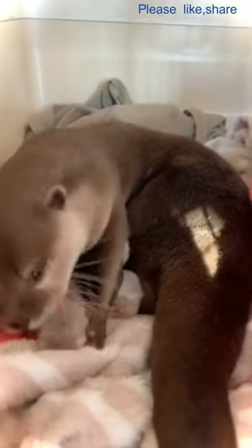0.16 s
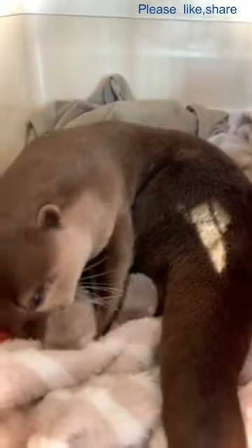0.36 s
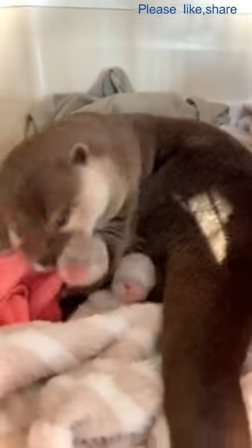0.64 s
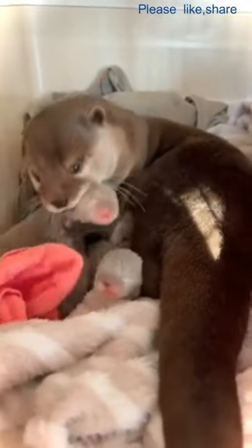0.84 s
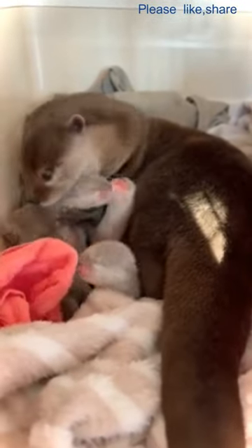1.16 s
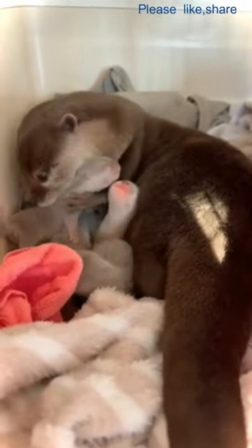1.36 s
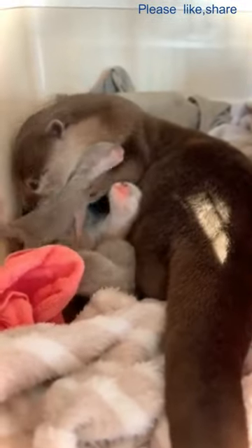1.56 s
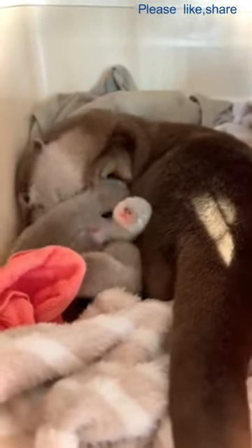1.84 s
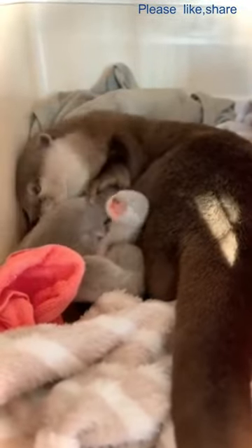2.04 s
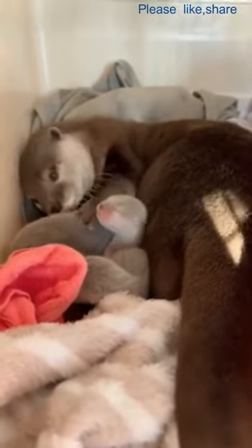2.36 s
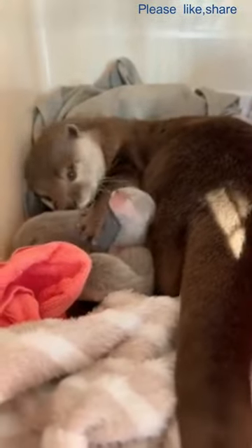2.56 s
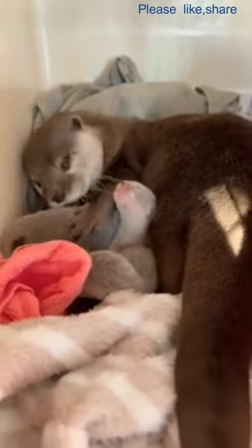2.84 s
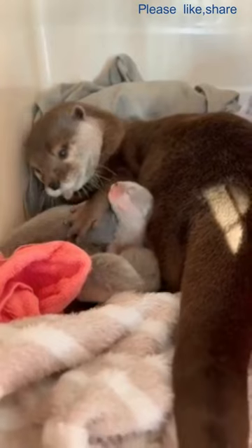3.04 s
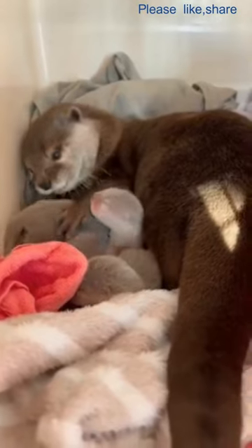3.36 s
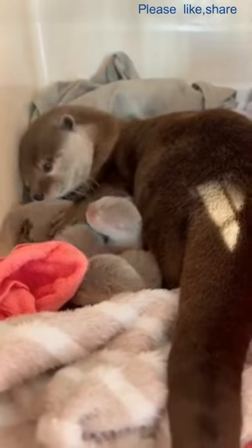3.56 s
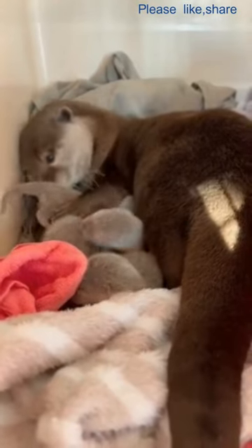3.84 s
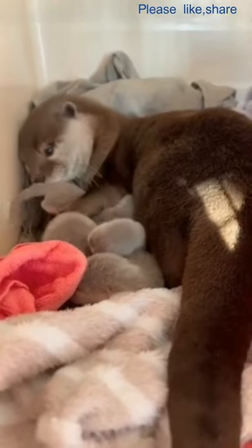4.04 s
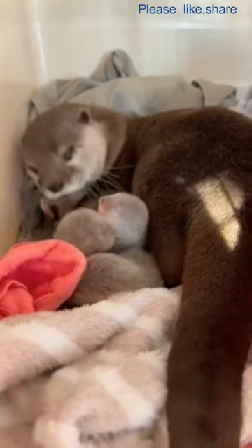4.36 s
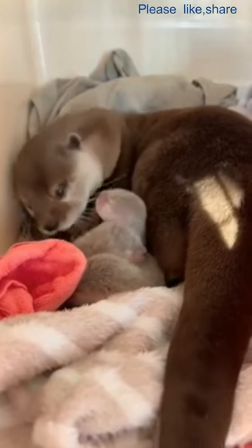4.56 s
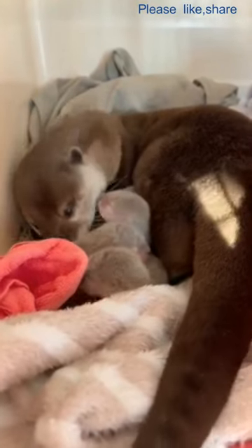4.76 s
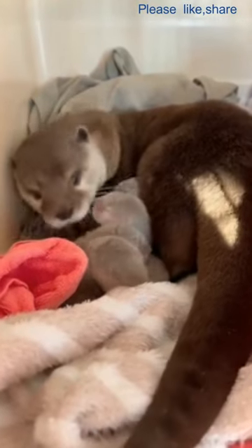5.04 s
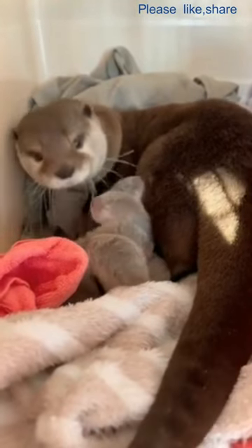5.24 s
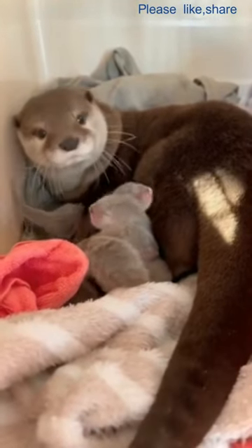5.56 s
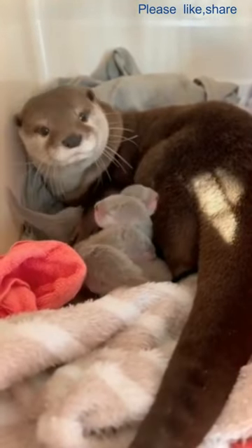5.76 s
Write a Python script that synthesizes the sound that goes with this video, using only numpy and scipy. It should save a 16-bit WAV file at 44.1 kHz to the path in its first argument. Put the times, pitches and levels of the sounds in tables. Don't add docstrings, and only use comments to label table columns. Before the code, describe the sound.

Close up in a nest box, a creaky animal whine gives way to shrill falling pup shrieks, then soft whimpers, sniffs, ticks and fur rustle.

```python
import sys
import numpy as np
from scipy import signal
from scipy.fft import rfft, irfft
from scipy.io import wavfile
from scipy.ndimage import uniform_filter1d

SR = 44100
rng = np.random.default_rng(int(sys.argv[2]) if len(sys.argv) > 2 else 0)


def makeup_ratio(level_db):
    decades = np.asarray(level_db, float) / 20
    return 10 ** decades


def log_audio(samples):
    frames = np.atleast_2d(samples).T
    limited = np.clip(frames, -1, 1)
    pcm = np.round(limited * 32767).astype(np.int16)
    wavfile.write(sys.argv[1], SR, pcm)


N = 260631
T = np.arange(N) / SR

# freq_hz, level_db
HISS = [(3000, -27.5), (4800, -12.5), (6000, 0), (10000, -11), (13000, -14), (15500, -30.5)]


def shape(x, points):
    hz, db = np.transpose(points)
    grid = np.maximum(np.arange(2049) * SR / 4096, 1)
    cepstrum = irfft(np.interp(np.log(grid), np.log(hz), db) * np.log(10) / 20)
    cepstrum[1:2048] *= 2
    cepstrum[2049:] = 0
    response = irfft(np.exp(rfft(cepstrum)))
    return signal.fftconvolve(x, response)[:len(x)]


def level(x, db):
    return x * makeup_ratio(db) / np.sqrt(np.mean(x ** 2))


def walk(rate_hz, count=N):
    k = max(int(SR / rate_hz), 1)
    return level(uniform_filter1d(uniform_filter1d(rng.standard_normal(count), k), k), 0)


def patchy(x, patch_db):
    cells = signal.stft(x, nperseg=256)[2]
    field = uniform_filter1d(rng.standard_normal(cells.shape), 3, axis=0)
    field = uniform_filter1d(field, 10, axis=1)
    return signal.istft(cells * makeup_ratio(patch_db * field / field.std()), nperseg=256)[1][:N]


def band(x, lo_hz, hi_hz):
    hz = np.fft.fftfreq(N, 1 / SR)
    edge = lambda f: np.clip((hz - f) / (f / 25) + .5, 0, 1)
    return np.fft.ifft(np.fft.fft(x) * 2 * edge(lo_hz) * (1 - edge(hi_hz)))


def span(table):
    s, *columns = np.transpose(table)
    at = np.arange(int(s[0] * SR), min(int(s[-1] * SR), N))
    return at, [np.interp(at / SR, s, c) for c in columns]


def mother():
    # time_s, pulse_rate_hz, level_db
    whines = [
        [(0, 452, -22.5), (.146, 459.8, -23), (.2, 466.2, -22.5), (.266, 460, -25), (.29, 444, -27),
         (.298, 440, -28.5), (.304, 447, -38.5)],
        [(.348, 399, -29.5), (.354, 378, -27.5), (.357, 385, -37), (.361, 380, -25.5), (.365, 401.5, -36.5),
         (.37, 417, -28), (.377, 467, -36)],
        [(.382, 355, -25), (.41, 358, -24.5), (.432, 386.5, -24), (.456, 408.5, -23), (.476, 381, -19.5),
         (.486, 433, -17.5), (.514, 465, -20.5), (.544, 451, -21.5), (.556, 510, -42)],
    ]
    # time_s, swap_db
    creak = [(.39, 0), (.398, 5), (.418, 4), (.425, 0)]
    # time_s, scatter_db
    uneven = [(.06, .13), (.08, .5), (.1, .13), (.29, .13), (.35, 3), (.38, 1.2), (.42, 1), (.428, .22),
              (.468, .22), (.482, 2.3), (.505, 1.1), (.518, .25)]
    # time_s, lift_db
    mouth_open = [(.3, 0.5), (.35, 6), (.385, 2.5), (.398, 10.5), (.436, 6.5), (.458, 4), (.474, 12),
                  (.515, 10), (.55, 3.5)]
    # freq_hz, level_db
    throat = [(450, 1.5), (920, 1), (1380, 2.5), (1840, 1), (2300, -11.5), (2750, -5.5), (3400, -15),
              (4100, -6), (5000, -12.5), (7800, -15.5), (8300, -39), (8800, -26), (10000, -38.5),
              (15000, -36)]
    out = np.zeros(N)
    for whine in whines:
        at, (hz, db) = span(whine)
        scatter_db = np.interp(T[at], *np.transpose(uneven))
        chance = rng.standard_normal((200, 2))
        cycles = np.arange(1, int(np.sum(hz) / SR))
        place = np.interp(cycles, np.cumsum(hz) / SR, np.arange(len(at)))
        i = place.astype(int)
        swap_db = np.interp(T[at[i]], *np.transpose(creak))
        place = place + .02 * scatter_db[i] * chance[cycles, 0] * SR / hz[i]
        size = makeup_ratio(scatter_db[i] * chance[cycles, 1] + swap_db * (-1.) ** cycles)
        gap = np.arange(len(at)) - place[:, None]
        pulses = size @ (np.sinc(gap) * np.exp(-(gap / 8) ** 2))
        leak = makeup_ratio(-19) * rng.standard_normal(len(at))
        voice = shape(level(pulses, 0) + leak, throat)
        lift = makeup_ratio(np.interp(T[at], *np.transpose(mouth_open))) - 1
        ring = signal.lfilter(*signal.iirpeak(2800, 3.5, SR), voice) * lift
        out[at] += level(voice + ring, 0) * makeup_ratio(db)
    return out


def mouth_db(hz):
    # freq_hz, level_db
    mouth = [(2000, -2.5), (4000, -6.5), (6000, 11), (7800, 20.5), (9500, -9), (11000, 4.5), (13500, -5.5),
             (16000, -8)]
    return np.interp(hz, *np.transpose(mouth))


def mouthed(call, second_db):
    s, hz, db = np.transpose(call)[:3]
    return np.transpose([s, hz, db, second_db + mouth_db(2 * hz) - mouth_db(hz)])


def notes(rows, path, second_db):
    attack, release, edge_db = 0.058, 0.68, -1.5
    u = np.linspace(0, 1, 17)
    swell_db = edge_db * np.maximum(np.maximum(1 - u / attack, 1 - (1 - u) / release), 0)
    return [np.transpose([s + length * u, a * (b / a) ** path(u), db + swell_db, second_db + 0 * u])
            for s, length, a, b, db in rows]


def pup(call, rough, fall_db, lift, breath_db, flutter_hz, wobble=0):
    at, (hz, db, second_db) = span(call)
    n = len(at)
    phase = 2 * np.pi * np.cumsum(hz * (1 + wobble * walk(200, count=n))) / SR
    rough = np.linspace(*rough, n)
    out = 0
    for k in range(1, 10):
        upper_db = 0
        if k > 1:
            upper_db = second_db - fall_db * (k - 2) + lift * (mouth_db(k * hz) - mouth_db(2 * hz))
        shake = 1 + rough * (walk(flutter_hz, count=n) + 1j * walk(flutter_hz, count=n))
        partial = makeup_ratio(upper_db) * np.imag(shake * np.exp(1j * k * phase))
        out = out + (k * hz < .45 * SR) * partial
    out = out + level(shape(rng.standard_normal(n), HISS), breath_db)
    edge = np.minimum(np.minimum(T[at] - T[at[0]], T[at[-1]] - T[at]) / .003, 1)
    return at, np.sqrt(2 / (1 + rough ** 2)) * makeup_ratio(db) * edge * out


def settle(knee):
    return lambda u: np.expm1(-u / knee) / np.expm1(-1 / knee)


def shrill_pups():
    # time_s, pitch_hz, first_partial_db
    squeals = [
        [(.561, 7000, -16), (.572, 6800, -13.5), (.597, 6700, -10.5), (.603, 6600, -26), (.607, 6580, -9),
         (.611, 6510, -24), (.613, 6450, -16), (.617, 6350, -22)],
        [(.616, 6420, -16), (.621, 6080, -6.5), (.633, 5660, -22.5), (.638, 5550, -17), (.66, 4485, -28.5),
         (.68, 3340, -46), (.706, 3250, -36.5), (.745, 2472, -44), (.756, 2200, -58.5)],
        [(.924, 9600, -36), (.937, 8650, -15), (.946, 8080, -3), (.955, 7800, -5.5), (.96, 7620, -13),
         (.966, 7460, -5.5), (.982, 6650, -10), (.989, 5860, -17), (1.01, 5200, -40)],
        [(1.927, 9000, -20), (1.935, 7950, -4.5), (1.945, 7680, -6.5), (1.954, 7600, -13), (1.963, 7500, -8.5),
         (1.974, 7300, -7), (1.988, 6800, -19.5), (2.012, 5555, -30.5)],
        [(2.555, 4863, -39), (2.562, 4523, -25.5), (2.571, 3850, -36), (2.578, 3140, -39.5), (2.6, 2052, -43),
         (2.625, 1706, -45.5), (2.65, 1471, -37.5)],
    ]
    squeal_second_db = [4, -1, 2.5, 4, -2.5]
    squeal_rough = [(.6, .7), (.3, .15), (.03, .2), (.04, .4), (.35, .2)]
    # beat_hz, depth_at_start (0-1), depth_at_end (0-1)
    squeal_beat = [(300, 0, 0), (300, 0, 0), (290, 0, .6), (300, .12, .95), (300, 0, 0)]
    # start_s, length_s, from_hz, to_hz, level_db
    whistles = [(2.008, 0.027, 8210, 9300, -28), (2.055, 0.026, 8280, 7720, -35),
                (2.25, 0.051, 7000, 5800, -36.5), (2.487, 0.016, 6590, 6400, -30.5),
                (2.51, .03, 6900, 7460, -48.5), (3.692, 0.037, 4630, 4866, -55.5)]
    # start_s, length_s, from_hz, to_hz, level_db
    peeps = [(2.028, 0.014, 8840, 7400, -18.5), (2.043, .014, 9405, 7530, -23.5),
             (2.408, 0.019, 5150, 5950, -35.5), (3.598, 0.037, 6440, 5600, -53),
             (3.64, 0.049, 5577, 5210, -50.5), (3.728, 0.033, 5510, 5950, -54.5),
             (4.228, 0.035, 8130, 6040, -45), (4.524, .03, 7260, 6220, -38),
             (4.555, 0.036, 6290, 6550, -51), (4.592, 0.02, 6530, 6700, -42),
             (4.61, .026, 6860, 5990, -38.5)]
    steady = (1, 0, 0)
    shrill = [(mouthed(call, db), rough, beat)
              for call, db, rough, beat in zip(squeals, squeal_second_db, squeal_rough, squeal_beat)]
    shrill += [(mouthed(call, -3), (.95, .95), steady) for call in notes(whistles, settle(1.0), 0)]
    shrill += [(mouthed(call, -9.0), (.25, .25), steady) for call in notes(peeps, settle(1.5), 0)]
    out = np.zeros(N)
    for call, rough, (beat_hz, first, last) in shrill:
        at, voice = pup(call, rough, fall_db=8.5, lift=0.96, breath_db=-32.0, flutter_hz=1000)
        depth = first + (last - first) * np.linspace(0, 1, len(at)) ** 2
        out[at] += voice * (1 + depth * np.cos(2 * np.pi * beat_hz * (T[at] - T[at[0]])))
    return out


def reedy_pups():
    # start_s, length_s, from_hz, to_hz, level_db
    reeds = [(2.652, 0.043, 1000, 963, -34), (4.365, 0.052, 1039, 1085, -36.5)]
    out = np.zeros(N)
    for call in notes(reeds, settle(0.86), -12.5):
        at, voice = pup(call, (.3, .3), fall_db=3.5, lift=.6, breath_db=-34.5, flutter_hz=246.0)
        out[at] += voice
    return out


def soft_pups():
    # start_s, length_s, from_hz, to_hz, level_db
    grunts = [(1.485, 0.023, 881.4, 580, -40.5), (2.03, 0.05, 474.2, 393.4, -45),
              (2.74, .016, 748, 504, -36.5), (3.088, 0.044, 1398, 619, -46), (3.325, 0.023, 584, 450, -40),
              (3.888, 0.03, 1393, 476, -36), (4.465, 0.016, 900, 593, -35.5), (4.702, 0.02, 1350, 480, -35),
              (4.932, 0.026, 1188, 618, -36), (5.192, 0.022, 1670, 980, -37),
              (5.215, .022, 790, 417, -41.5), (5.458, 0.012, 1223, 1051, -41.5),
              (5.485, 0.039, 625, 494, -40.5)]
    # start_s, length_s, from_hz, to_hz, level_db
    slides = [(.16, 0.036, 520, 600, -31), (.158, 0.022, 1545, 1610, -39),
              (1.594, 0.032, 579.4, 632, -37.5), (2.387, 0.014, 1457, 1910, -35),
              (3.358, 0.03, 528, 645, -33), (3.38, .012, 650, 896, -38.5), (3.568, 0.024, 561, 529, -39.5),
              (4.33, 0.033, 590, 774, -35), (5.865, 0.046, 1482, 2190, -44)]
    # start_s, length_s, end_pitch_hz, turn_pitch_hz, level_db
    bows = [(1.85, 0.0377, 1082, 1089, -44.5)]
    # start_s, length_s, end_pitch_hz, turn_pitch_hz, level_db
    coos = [(2.195, .06, 704, 504, -37), (2.8, 0.075, 523, 685, -36.5), (3.16, 0.023, 1042, 1060, -48),
            (3.592, 0.082, 787, 735, -39)]
    # time_s, pitch_hz, level_db
    warbles = [
        [(.868, 1385, -33.5), (.885, 1820, -26.5), (.9, 1967, -30.5), (.925, 1750, -28), (.942, 2065, -31.5),
         (.955, 2050, -42), (.985, 1600, -38), (1.03, 1070, -54), (1.058, 1375, -43)],
        [(3.81, 5700, -60), (3.824, 4200, -50), (3.838, 2800, -47), (3.855, 2550, -43), (3.875, 1900, -52),
         (3.892, 1200, -48)],
        [(4.825, 1738, -58), (4.838, 1685, -41), (4.85, 2175, -35.5), (4.87, 2156, -43), (4.9, 1817, -53)],
        [(5.078, 1495, -43), (5.095, 1640, -44), (5.108, 2273, -36.5), (5.125, 2457, -47), (5.145, 2150, -47)],
    ]
    warble_second_db = [-30, -36, -9, -10]
    # time_s, pitch_hz, level_db
    whimpers = [
        [(.18, 1148, -45), (.21, 1420, -32.5), (.238, 1613, -34), (.255, 1494, -36), (.282, 1120, -42)],
        [(1.078, 1038, -48.5), (1.105, 976, -45.5), (1.122, 685, -41.5), (1.14, 596, -41.5),
         (1.165, 399.4, -51.5)],
        [(1.205, 907, -48), (1.222, 645, -40), (1.24, 673, -41), (1.25, 838, -42), (1.275, 900, -41),
         (1.288, 990, -45.5)],
        [(1.318, 1073, -44), (1.345, 922, -45), (1.372, 970, -46.5), (1.386, 795, -54.5)],
        [(2.112, 936, -47), (2.12, 851, -46.5), (2.166, 791, -40), (2.226, 786, -39.5), (2.266, 953, -47),
         (2.29, 960, -56)],
        [(2.33, 1063, -43.5), (2.345, 561, -35.5), (2.37, 499, -43.5), (2.398, 520, -49.5)],
        [(2.45, 703, -44.5), (2.468, 556, -33.5), (2.54, 589, -40), (2.558, 616, -38), (2.592, 607, -45),
         (2.615, 569, -60)],
        [(3.0, 462, -35), (3.02, 633, -38.5), (3.035, 938, -42.5), (3.045, 894, -46), (3.058, 503, -42.5)],
    ]
    whimper_second_db = [-10, -5, -8, -10.5, -7.5, -11, -10, -19]
    # start_s, length_s, from_hz, to_hz, level_db
    pops = [(1.054, .01, 2700, 2680, -50), (1.588, .01, 2750, 2700, -48), (1.834, .007, 2700, 2700, -48),
            (1.732, .01, 600, 620, -40), (4.563, .007, 2400, 2400, -46), (4.974, .01, 1500, 1600, -42),
            (5.205, .006, 2000, 2050, -45), (5.247, .009, 3900, 3800, -45), (5.308, .007, 2300, 2600, -49),
            (5.238, .006, 1600, 1400, -45), (4.735, .012, 560, 600, -43), (3.478, .008, 600, 560, -43),
            (5.755, .01, 7400, 7500, -50), (5.7, .016, 900, 750, -44), (1.44, .014, 650, 950, -46),
            (1.538, .016, 850, 600, -46)]
    arch = lambda u: 4 * u * (1 - u)
    calls = notes(grunts, settle(0.32), -17) + notes(slides, settle(3), -16.5)
    calls += notes(bows, arch, -3) + notes(coos, arch, -29)
    calls += [[(*row, db) for row in call] for call, db in zip(warbles, warble_second_db)]
    calls += [[(*row, db) for row in call] for call, db in zip(whimpers, whimper_second_db)]
    calls += notes(pops, settle(2.4), -39.5)
    waver = makeup_ratio(1.6 * walk(70))
    out = np.zeros(N)
    for call in calls:
        at, voice = pup(call, (.22, .22), fall_db=15, lift=.4, breath_db=-35, flutter_hz=250, wobble=.008)
        out[at] += voice * waver[at]
    return out


def puffs():
    # start_s, length_s, chest_db, air_db
    breaths = [(3.82, 0.15, -41.5, -49), (1.924, 0.053, -48, -41), (3.7, 0.1, -52, -65),
               (1.692, 0.036, -42, -59), (2.732, .13, -38.5, -54.5), (3.09, 0.036, -38.5, -64),
               (3.337, 0.043, -46.5, -60), (3.562, 0.029, -46.5, -64), (3.985, 0.064, -39, -75),
               (4.278, 0.023, -48, -59.5), (4.457, 0.073, -43.5, -53.5), (4.931, 0.067, -34.5, -47),
               (5.2, 0.1, -43.5, -51.5), (5.476, 0.057, -34.5, -43.5), (5.702, .064, -47.5, -50.5),
               (5.798, 0.085, -49.5, -53)]
    # start_s, length_s, chest_db, air_db
    rustles = [(.107, 0.1, -34, -50), (.282, 0.15, -34, -51.5), (.754, .17, -34, -45.5),
               (2.07, 0.057, -36.5, -50.5), (1.088, 0.048, -47, -52), (1.578, .065, -38.5, -57.5),
               (1.737, 0.049, -44.5, -61.5), (2.18, .11, -44.5, -55), (2.34, .09, -39.5, -43.5),
               (2.447, 0.14, -42, -45.5), (2.938, .13, -37, -57), (3.234, 0.051, -34, -64.5),
               (3.94, 0.062, -45, -46.5), (4.15, .11, -46, -62.5), (4.326, 0.1, -40.5, -48.5),
               (4.649, 0.11, -40.5, -61.5)]
    # start_s, length_s, chest_db, air_db
    wheezes = [(.562, 0.062, -60, -30), (.624, .11, -62.5, -37), (.638, .045, -60, -32),
               (1.44, 0.043, -48.5, -65.5), (1.888, 0.047, -55.5, -50.5), (1.995, 0.084, -45, -29.5),
               (2.617, .079, -47, -42.5), (2.89, 0.044, -56, -57)]
    # start_s, length_s, chest_db, air_db
    sniffs = [(.916, .006, -60, -38), (1.049, .034, -57, -40), (1.143, .014, -50, -42),
              (1.9, .018, -60, -52)]
    # freq_hz, level_db
    chest_tone = [(250, -12.5), (450, 12.5), (1200, 2), (2000, -10.5), (3000, -34.5)]
    # freq_hz, level_db
    nose_tone = [(1200, -19), (2000, -0.5), (3000, -4.5), (4300, -3), (6500, -12.5), (8500, -32.5)]
    # freq_hz, level_db
    thin_tone = [(5000, -22), (8000, -1), (10000, -5), (13500, -4.5), (15500, -13.5)]
    # freq_hz, level_db
    whiff_tone = [(4300, -30), (5400, 0), (7800, 0), (9000, -24), (12000, -20), (15500, -34)]
    flutter = makeup_ratio(1.1 * walk(163.3))
    tones = (chest_tone, nose_tone, HISS, thin_tone, whiff_tone)
    layers = [level(patchy(shape(rng.standard_normal(N) * flutter, tone), patch_db=5.0), 0)
              for tone in tones]
    # nose, hiss, thin hiss and whiff re the air level (dB)
    kinds = [(breaths, (-0.5, -9, -29.5, -19.5)), (rustles, (0, 0.5, -7.5, -21)),
             (wheezes, (-20.5, -5, 3, -8.5)), (sniffs, (-18, -14, -30, 2))]
    gains = np.zeros((len(layers), N))
    for rows, mix_db in kinds:
        for s, length, chest_db, air_db in rows:
            layer_db = np.array([chest_db, *np.add(air_db, mix_db)])
            at = slice(int(s * SR), int((s + 2 * length + .06) * SR))
            rise = np.clip((T[at] - s) / (0.27 * length), 0, 1)
            fade = np.exp(-np.clip(T[at] - s - .85 * length, 0, 1) / (.1 * length + .006))
            gains[:, at] += makeup_ratio(layer_db)[:, None] * rise * fade
    return np.sum(gains * layers, axis=0)


def cracks(rows):
    out, t = np.zeros(N), T[:400]
    for s, db in rows:
        start = int(s * SR)
        out[start:start + len(t)] += makeup_ratio(db) * rng.standard_normal(len(t)) * np.exp(-t / .0006)
    return out


def ticks():
    # time_s, peak_db
    sharp = [(1.052, -48), (1.077, -50), (1.108, -33.5), (1.461, -48.5), (1.576, -42), (4.742, -46.5),
             (5.249, -42.5), (3.566, -50.5), (3.782, -49.5), (3.99, -39), (4.152, -54.5), (4.206, -48.5),
             (4.695, -47.5), (2.482, -28), (5.207, -49), (5.399, -49.5), (5.71, -44.5), (5.728, -47.5),
             (5.808, -48), (5.7543, -38)]
    # time_s, peak_db
    smacks = [(1.938, -42), (4.29, -43.5), (1.679, -35), (1.836, -43.5), (5.226, -31), (5.25, -38),
              (5.399, -52)]
    # freq_hz, level_db
    smack_tone = [(500, -12.5), (1500, 6), (3000, -8.5), (5500, -27.5)]
    rattle = [(s, -32) for s in np.arange(1.695, 1.721, 1 / 330)]
    return cracks(sharp) + makeup_ratio(9) * shape(cracks(smacks + rattle), smack_tone)


def echo(animals):
    box_t60_s, box_db = .09, -12.5
    room_t60_s, room_db = .3, -16
    t = T[:SR // 2]

    def fade(t60):
        decay = np.exp(-np.log(1000) * t / t60) / np.sqrt(t60 * SR / np.log(1e6))
        return rng.standard_normal((2, len(t))) * decay

    room = signal.lfilter(*signal.butter(2, 2000, fs=SR), fade(room_t60_s))
    tails = makeup_ratio(box_db) * fade(box_t60_s) + makeup_ratio(room_db) * room
    shared = tails.mean(axis=0)
    tails = shared + signal.lfilter(*signal.butter(1, 900, 'high', fs=SR), tails - shared)
    return np.array([signal.fftconvolve(animals, tail * (t > .001))[:N] for tail in tails])


def hum():
    # freq_hz, level_db
    rumble = [(25, -30.5), (40, -28), (52, -10), (150, -8), (350, -15.5), (450, -25), (1000, -29),
              (2000, -45.5), (5000, -53), (8000, -60.5), (13000, -58.5), (15500, -61)]
    # freq_hz, width_hz, level_db
    motor = [
        (63.4, 6, -47.5),
        (139, 10, -49.5),
        (152.33, 2.7, -45.5),
    ]
    # time_s, gain_db
    phone_gain = [(.9, -0.5), (1.05, -5), (1.9, -1), (2.05, -2.5), (3.1, 0)]
    hum_db = -41.5
    mid = level(patchy(shape(rng.standard_normal(N), rumble), patch_db=2.5), hum_db)
    side = level(patchy(shape(rng.standard_normal(N), rumble), patch_db=4.5), hum_db)
    side = shape(side, [(30, -25.5), (120, -21), (300, -11), (600, 7), (12000, 0.5)])
    for hz, width_hz, db in motor:
        tone = signal.lfilter(*signal.iirpeak(hz, hz / width_hz, SR), rng.standard_normal(N))
        mid = mid + level(tone, db)
    return np.array([mid + side, mid - side]) * makeup_ratio(np.interp(T, *np.transpose(phone_gain)))


def scene():
    air = puffs()
    animals = mother() + shrill_pups() + reedy_pups() + soft_pups() + air + ticks()
    sides = np.array([[1], [-1]])
    lean = makeup_ratio(-19.5) * walk(25) * np.imag(band(animals, 2500, 17000)) * sides
    nest = air * (makeup_ratio(.5 * sides * 2.5) - 1)
    return lean + animals * makeup_ratio(.25 * sides) + nest + echo(animals) + hum()


def refill_top(x):
    split_hz, shift_hz = 9900, 6200
    power = lambda v: uniform_filter1d(np.abs(v) ** 2, SR // 80) + 1e-14
    copy = band(x, split_hz - shift_hz, split_hz - 500) * np.exp(2j * np.pi * shift_hz * T)
    noise = band(patchy(rng.standard_normal(N), patch_db=-12.5), 10400, 18000)
    fill = copy / np.sqrt(power(copy)) + 0.76 * noise / np.sqrt(power(noise))
    loudness = np.sqrt(power(band(x, split_hz, .45 * SR)))
    return np.real(band(x, 36, split_hz) + loudness * fill)


def drop_masked(x, under_db):
    cells = signal.stft(x, nperseg=1024)[2]
    power = uniform_filter1d(np.abs(cells) ** 2, 16, axis=1)
    keep = power > makeup_ratio(-2 * under_db) * power[:, 24:].max(axis=1, keepdims=True)
    luck = uniform_filter1d(rng.standard_normal(cells.shape[1:]), 9, axis=0)
    luck = uniform_filter1d(luck, 4, axis=1)
    keep[:, 60:] &= luck[60:] < 1.35 * luck.std()
    return signal.istft(cells * keep, nperseg=1024)[1][:, :N]


def roll_off(x):
    return signal.sosfilt(signal.butter(12, 15340, fs=SR, output="sos"), x)


def record(dry):
    clipped = np.clip(dry, -.97, .97)
    thinned = drop_masked(refill_top(clipped), under_db=42)
    return roll_off(np.clip(thinned, -1, 1))


dry = scene()
out = record(dry)
log_audio(out)
```